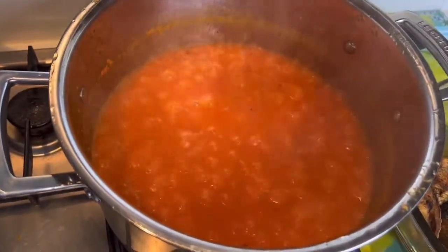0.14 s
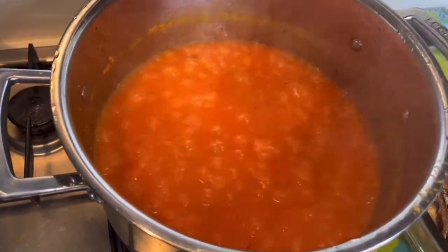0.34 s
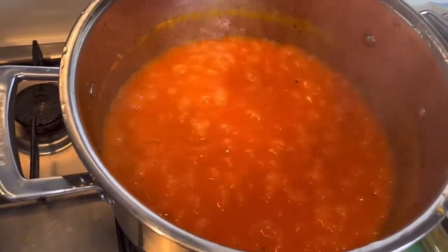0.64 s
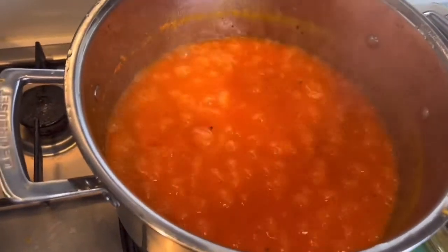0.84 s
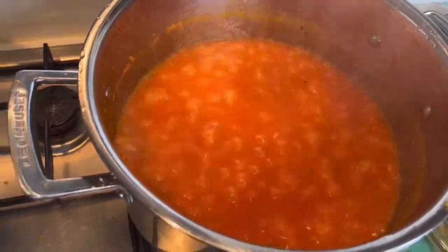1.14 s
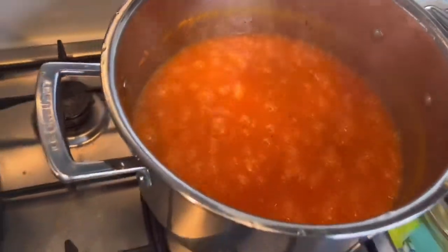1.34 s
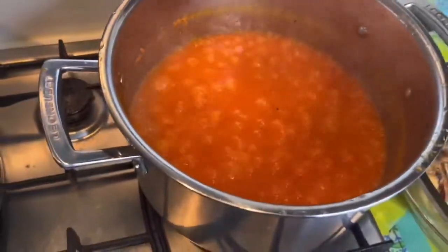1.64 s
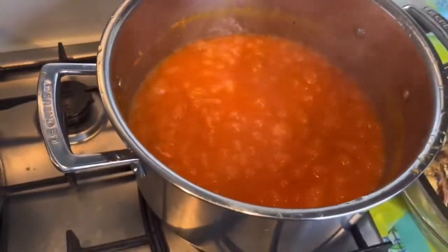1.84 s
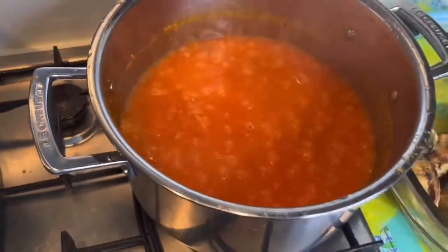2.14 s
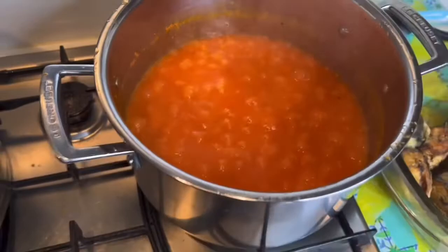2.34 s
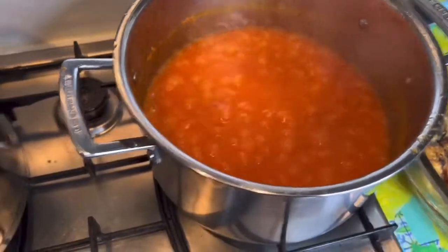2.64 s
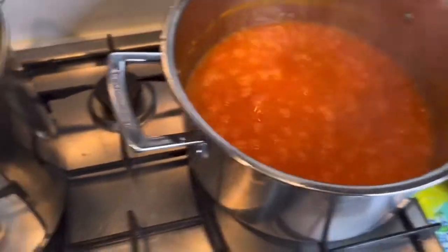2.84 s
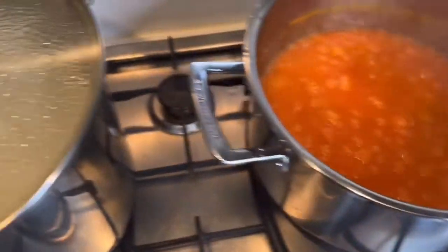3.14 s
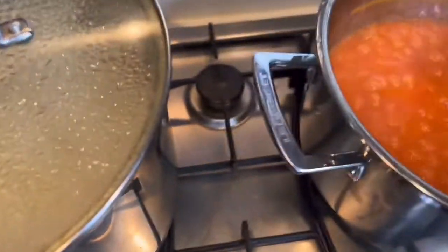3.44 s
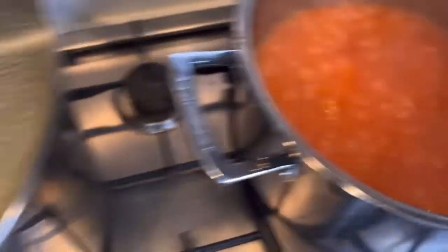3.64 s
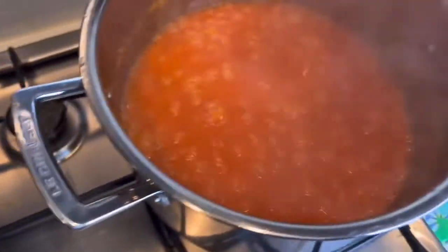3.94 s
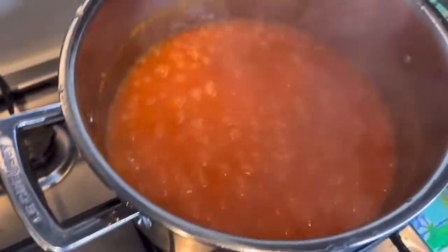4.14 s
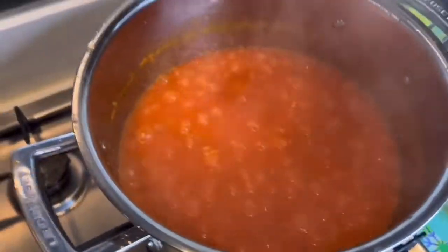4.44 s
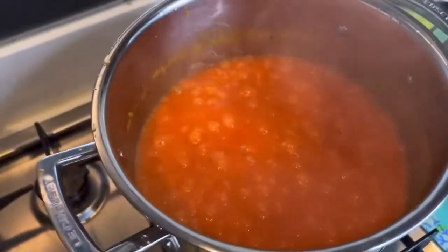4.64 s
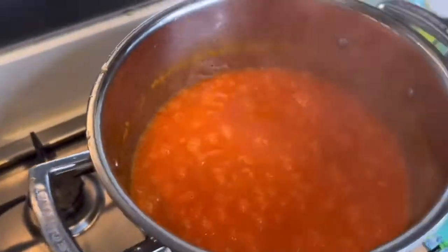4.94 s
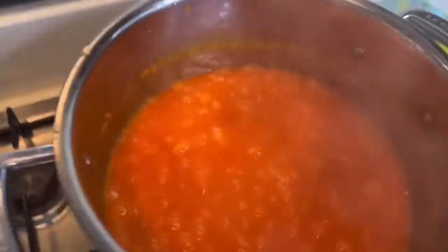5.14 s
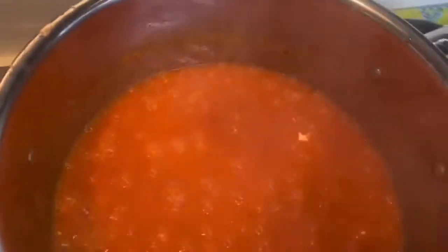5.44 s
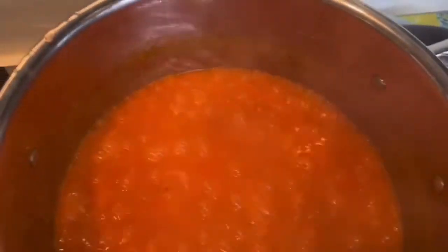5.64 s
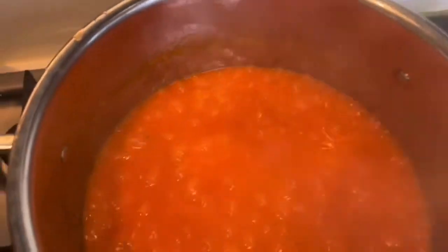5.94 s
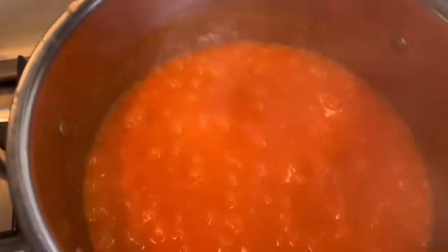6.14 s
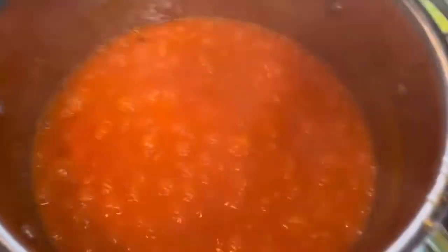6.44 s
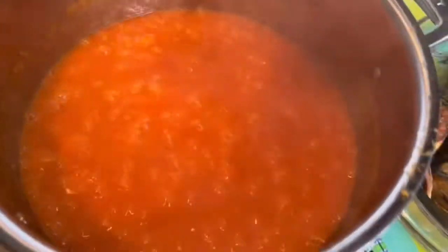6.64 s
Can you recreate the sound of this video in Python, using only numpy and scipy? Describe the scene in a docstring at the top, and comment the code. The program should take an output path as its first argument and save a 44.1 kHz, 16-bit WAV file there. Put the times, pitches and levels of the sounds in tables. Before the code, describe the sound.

Close simmering sauce blips and plops above steady gas hiss, interrupted midway by a bright metallic lid rattle, later faint knocks and handling bumps.

```python
"""Thick tomato stew bubbles and plops over a hissing, rumbling gas flame; just to the left a pot lid
clatters twice and rattles to rest, among soft knocks, ticks, a faint drag and low bumps of the microphone.
Bubbles are damped sines, some rising in pitch; the burner is coloured noise with whistling resonances.
The lid is a bank of steel modes, high clang, enclosed air and pot thud, all struck by one list of contacts.
Knocks are filtered noise bursts; bumps are slow swings with a dull rub."""
import sys
import numpy as np
from scipy import signal
from scipy.fft import rfft, irfft
from scipy.io import wavfile

SR = 44100
rng = np.random.default_rng(int(sys.argv[2]) if len(sys.argv) > 2 else 0)


def dump_mix(stems):
    """Bounce the given channels to the path in sys.argv[1] as a 16-bit WAV at rate SR."""
    frames = np.atleast_2d(stems).T  # one column per channel
    limited = np.clip(frames, -1, 1)  # hard clip at full scale
    pcm = np.round(limited * 32767).astype(np.int16)
    wavfile.write(sys.argv[1], SR, pcm)


N = 299747
T = np.arange(N) / SR
FREQS = np.maximum(np.arange(N // 2 + 1) * SR / N, 1)
LID_LEAD_S = 0.00024  # the left side is nearer to the lid
SLIDE_S = 3.95  # the lid slips to its second seat


def from_db(db):
    """Decibels to gain."""
    return 10 ** (np.asarray(db) / 20)


def rms_one(x):
    """Scale to unit power."""
    return x / np.sqrt(np.mean(x ** 2) + 1e-20)


def at_hz(points, hz):
    """Read a table on a log-frequency axis."""
    table_hz, table_db = np.array(points).T
    return np.interp(np.log(hz), np.log(table_hz), table_db)


def noise(colour_db):
    """Steady noise of a given spectral density shape, rms 1."""
    return rms_one(irfft(rfft(rng.standard_normal(N)) * from_db(colour_db), N))


def stereo(mid, side):
    """Mid and side to left and right."""
    return np.array([mid + side, mid - side])


def add(out, start_s, sound):
    """Mix a short sound in at a given time."""
    start = int(start_s * SR)
    part = out[..., start:start + sound.shape[-1]]
    part += sound[..., :part.shape[-1]]


def later(x, lag_s):
    """Delay by a fraction of a millisecond, as for the farther side."""
    return np.interp(T - lag_s, T, x)


def ring(clicks, hz, t60_s):
    """Two-pole resonance: a unit click starts a damped sine of height about 1."""
    r = from_db(-60 / (t60_s * SR))
    w = 2 * np.pi * hz / SR
    return signal.lfilter([0, np.sin(w)], [1, -2 * r * np.cos(w), r * r], clicks + 1e-18)


def blows(times, level_db, spread_db):
    """One click per contact, each of a slightly different strength."""
    clicks = np.zeros(N)
    clicks[(times * SR).astype(int)] = from_db(level_db + spread_db * rng.standard_normal(len(times)))
    return clicks


def kitchen(x, wet_db, t60_s, wall_hz):
    """Dense reflections off hob, tiles and cupboards: decaying dull noise, different on each side."""
    t = np.arange(SR // 2) / SR
    tail = rng.standard_normal((2, len(t))) * from_db(-60 * t / t60_s) * (t > .003)
    tail = signal.sosfilt(signal.butter(1, wall_hz, fs=SR, output="sos"), tail)
    tail /= np.sqrt(np.sum(tail ** 2, axis=1, keepdims=True))
    return x + from_db(wet_db) * signal.fftconvolve(x, tail, axes=1)[:, :N]


def simmering(per_s, size_db, cycles, side_db, count=36):
    """Countless small bursts, dealt to short resonances from large to small bubbles; rms 1."""
    # colour of the small bubbles: f/Hz, relative density/dB
    bubble_colour = [(150, -25), (280, -0.5), (360, -0.5), (440, -19), (550, 5), (800, -8.5), (1150, 2.5),
                     (1450, -9), (1800, -8), (2500, -9.5), (3500, -17)]
    out = np.zeros((2, N))
    for hz in np.geomspace(200, 3400, count):
        draws = rng.random((1000, 4))[:int(per_s * N / SR / count)]
        when, size, sign, place = draws.T
        height = np.sign(sign - .5) * from_db(size_db * np.minimum(-np.log(size), 3.5))
        clicks = np.zeros((2, N))
        clicks[:, (when * N).astype(int)] = stereo(height, height * from_db(side_db) * (2 * place - 1))
        band = rms_one(ring(clicks, hz, cycles / hz))
        out += band * from_db(at_hz(bubble_colour, hz)) * np.sqrt(hz)  # bandwidth grows with pitch
    return rms_one(out)


def plops(simmer_db):
    """Large bubbles at set times and random middling ones; low ones ring for the fewest cycles."""
    # largest bubbles: t/s, level/dB, f/Hz
    large_bubbles = [(.111, -31, 2530), (.112, -34, 2060), (.266, -33, 530), (.385, -34, 960),
                     (.494, -33, 860), (.496, -31, 300), (.631, -33, 1090), (.633, -33, 1970),
                     (.652, -34, 320), (.742, -30, 930), (.767, -32, 860), (.816, -32, 625),
                     (.818, -32, 460), (.935, -27.5, 720), (1.227, -35, 2400), (1.261, -27, 840),
                     (1.262, -30, 560), (1.394, -29, 1660), (1.396, -26.5, 1850), (1.582, -30.5, 815),
                     (1.726, -30, 546), (1.814, -29, 622), (2.013, -41, 2480), (2.204, -34, 850),
                     (2.347, -34, 615), (2.393, -34, 1250), (2.590, -32, 1140), (2.621, -32, 339),
                     (2.733, -27, 930), (3.268, -31, 1690), (3.327, -29, 1150), (4.666, -37, 1440),
                     (4.895, -40, 1960), (4.968, -39, 1870), (4.987, -31, 1090), (5.119, -32, 550),
                     (5.219, -29, 1050), (5.477, -36, 776), (6.009, -42, 1920), (6.177, -27.5, 527),
                     (6.707, -38, 1760)]
    blips_per_s, low_hz, high_hz = 14, 286, 1064
    above_simmer_db, spread_db = 19, 5
    cycles_at_1khz = 14.6
    when, size, pitch = rng.random((200, 3))[:int(blips_per_s * N / SR)].T
    blip_db = simmer_db[(when * N).astype(int)] + above_simmer_db + spread_db * (2 * size - 1)
    blip_hz = low_hz * (high_hz / low_hz) ** pitch
    out = np.zeros((2, N))
    for s, level_db, hz in [*large_bubbles, *zip(when * N / SR, blip_db, blip_hz)]:
        cycles = cycles_at_1khz * (hz / 1e3) ** 0.81
        add(out, s, from_db(level_db) * bubble(hz, cycles, glide=0.16, rise_cycles=1.0))
    return kitchen(out, wet_db=-7.0, t60_s=0.064, wall_hz=4000)


def bubble(hz, cycles, glide, rise_cycles):
    """A bursting bubble rings briefly, rising in pitch as its cavity opens."""
    turns = np.arange(int(cycles / hz * SR)) * hz / SR
    swing = np.sin(2 * np.pi * turns * (1 + glide * turns / cycles))
    return swing * from_db(-60 * turns / cycles) * (1 - np.exp(-turns / rise_cycles))


def fizz(per_s, size_db, low_hz):
    """Tiny droplets spit off the surface as sharp, faint ticks: high-passed clicks; rms 1."""
    when, size, sign, place = rng.random((20000, 4))[:int(per_s * N / SR)].T
    height = np.sign(sign - .5) * from_db(size_db * np.minimum(-np.log(size), 4.5))
    ticks = np.zeros((2, N))
    ticks[:, (when * N).astype(int)] = stereo(height, height * (place - .5))
    return rms_one(signal.sosfilt(signal.butter(1, low_hz, "high", fs=SR, output="sos"), ticks))


def lid():
    """The lid rocks on the rim; each contact rings the steel, the air beneath it and the pot."""
    # pot on the hob: f/Hz, level/dB, t60/s
    pot_modes = [(137, -3, 0.18), (187.6, -6.5, 0.17), (272, -6, 0.081), (394, 2.5, 0.038), (523, 2, 0.062)]
    thud_re_clunk_db, thud_slid_gain_db = -30.5, 11.5
    times, ring_db, clunk_db, overtone_db, clang_db, pitches, favoured_hz = contacts()

    air = clunks(times, clunk_db, pitches)
    air = signal.sosfilt(signal.butter(4, 1800, fs=SR, output="sos"), air)  # enclosed air carries no treble
    hollow = np.array([air, later(air, LID_LEAD_S)]) * from_db([[1], [-3.5]])

    thud_db = clunk_db + thud_re_clunk_db + thud_slid_gain_db * (times > SLIDE_S)
    thud = np.zeros(N)
    for k, (hz, level_db, t60_s) in enumerate(pot_modes):
        thud += ring(blows(times, thud_db + level_db, spread_db=2.0), hz, t60_s) * (-1) ** k
    low = hollow + thud * from_db([[.5], [-.5]])

    hard = blows(times, clang_db, spread_db=1.5)
    bright = clang(hard, t60_s=0.22, uneven_db=17) + crack(hard, level_db=-4.0, t60_s=0.022)
    high = steel(times, ring_db, overtone_db, favoured_hz) + bright
    ringing = kitchen(high, wet_db=-11.5, t60_s=0.39, wall_hz=5200)
    return ringing + kitchen(low, wet_db=-12.0, t60_s=0.35, wall_hz=4030)


def contacts(count=8):
    """Every fall, its weaker rebound, and the ever quicker, weaker touches of each rattle, as columns."""
    # falls on the rim: t/s, ring/dB, clunk/dB, overtone/dB, clang/dB, clunk pitch ratio, favoured f/Hz
    falls = [(3.3729, -11, -2, -22.5, -23.5, 1, 5470), (3.392, -16.5, -22, -26.5, -46, 1.16, 3880),
             (3.409, -18, -29, -33, -45, 0.68, 3160), (3.4471, -19.5, -5, -32, -24.5, 0.9, 3160),
             (3.4826, -11.5, -3, -29, -27.5, 1.09, 3880), (3.507, -16, -27, -39, -40, 1.2, 5010),
             (3.5194, -6, -6.5, -24.5, -24.5, 0.92, 3880), (3.543, -6.5, -6.5, -28, -33, 1.03, 4510),
             (3.565, -14, -15, -37, -32, 0.93, 4510), (3.583, -13, -12, -35, -26, 0.99, 5010),
             (3.599, -7.5, -12, -27, -28, 1.06, 3880), (3.616, -7, -21, -35, -37, 0.82, 5010),
             (3.631, -25, -20, -25.5, -31, 0.92, 3100), (3.645, -18, -14, -29.5, -38, 1.01, 4510),
             (3.655, -16, -22, -38, -38, 1.2, 3170), (3.9555, -23.5, -19.5, -50, -54, 0.88, 3880),
             (3.971, -9.5, -2.5, -50, -60, 0.862, 3138), (3.985, -18, -12, -39, -58, 0.8, 3138),
             (4.001, -5.5, -6, -29.5, -27, 0.99, 3880), (4.019, -14, -18, -26, -39, 0.98, 4940),
             (4.0336, -6.5, -15, -29, -33, 1, 3880), (4.052, -22, -24, -35, -29.5, 1.01, 4510)]
    # rattles to rest: t/s, first ring/dB, first overtone/dB, first clang/dB, loss per touch/dB, favoured f/Hz
    rattle_runs = [(3.681, -21.5, -35, -45, 4.5, 3170), (4.079, -15.5, -35, -39, 15, 3880)]
    rebound_s, rebound_db, rebound_clunk_db = .008, -12, -13.5
    first_gap_s, gap_ratio = 0.015, 0.908
    clunk_re_ring_db = -1.5
    drop_db = np.array([rebound_db, rebound_clunk_db, rebound_db, rebound_db])
    rows = list(falls)
    for s, *levels_db, pitch, favoured_hz in falls:
        rebound_at_s = s + rebound_s * rng.uniform(.7, 1.3)
        rows.append((rebound_at_s, *(np.array(levels_db) + drop_db), pitch, favoured_hz))
    for s, ring_db, overtone_db, clang_db, loss_db, favoured_hz in rattle_runs:
        first_db = np.array([ring_db, ring_db + clunk_re_ring_db, overtone_db, clang_db])
        for k in range(count):
            rows.append((s, *(first_db - loss_db * k), 1, favoured_hz))
            s = s + first_gap_s * gap_ratio ** k
    return np.transpose(sorted(rows))


def steel(times, ring_db, overtone_db, favoured_hz):
    """The lid's main modes, in a mix that shifts with how it lies; high ones have a drive of their own."""
    # f/Hz, level/dB, t60/s, left re right/dB, change in low rattle/dB, change after the slide/dB
    lid_modes = [(454, -28.5, 0.093, 8, 4, -6), (631, -22, 0.085, 1, -6, -2), (705, -22, 0.3, -2, 3.5, 3.5),
                 (774, -20, 0.42, 7, 2, -4), (876, -21, 0.11, 1, -14, 3), (994, -28, 2.45, 7, -7, -36),
                 (1089, -25, 0.026, -2, -11, 19.5), (1171, -23, 0.49, -3, -9, -4),
                 (1349, -7, 0.13, 17, 0.5, 0.5), (1374, 2.5, 0.17, 0, -5.5, -4),
                 (1470, -25.5, 0.42, -10, -10, 4), (1389, -13.5, 0.069, 13, 7, 5),
                 (1535, -10, 0.43, 6.5, -8, -8), (1652, -17.5, 0.2, 13.5, -17, -8.5),
                 (1692, -23.5, 0.4, -16.5, 0.5, -10), (1936, -28, 0.18, 15, 11.5, -5),
                 (2080, -33.5, 0.14, 18, -3, 14), (2107, -32, 0.5, 5, 4, 11),
                 (2374, -25.5, 0.39, -10, -5, -3), (2642, -35.5, 0.21, 13, -3, 8.5),
                 (3090, -17.5, 0.41, 2, 10.5, 12), (3146, -7, 0.36, -4, 0.5, 5),
                 (3890, -7.5, 0.32, 8.5, -3.5, 4), (4505, -7.5, 0.29, 8.5, 5, 6), (4880, -23, 0.3, 4, 2, 8),
                 (4994, -8.5, 0.32, 11.5, 5.5, 0.5), (5440, -8.5, 0.43, 10.5, -6, -14),
                 (5820, -10.5, 0.37, 16, 0, 4.5), (6100, -11, 0.52, 14, -5, 3),
                 (6360, -11, 0.42, 17, -2, -4), (8140, -12, 0.42, 2, -9, 2.5), (8600, -7, 0.26, 16, -9, -1)]
    low_rattle_s = 3.59  # the lid has sunk and rattles close to the rim
    overtone_from_hz = 2900
    favour_db, favour_octaves = 8, .06  # where the rim is touched favours one overtone
    t = times[0] + np.arange(int(1.3 * SR)) / SR
    pair, out = np.zeros((2, len(t))), np.zeros((2, N))
    for hz, level_db, t60_s, lean_db, low_db, slid_db in lid_modes:
        drive_db = ring_db
        if hz > overtone_from_hz:
            off_octaves = np.log2(hz / favoured_hz)
            drive_db = overtone_db - favour_db * (1 - np.exp(-(off_octaves / favour_octaves) ** 2))
        seat_db = np.select([times > SLIDE_S, times > low_rattle_s], [slid_db, low_db])
        mode = rattled(t, times, drive_db + seat_db + level_db, hz, t60_s, contact_hz=457)
        late = np.exp(-2j * np.pi * hz * LID_LEAD_S)
        pair += np.real([mode * from_db(lean_db / 2), mode * late * from_db(-lean_db / 2)])
    add(out, times[0], pair)
    return out


def rattled(t, times, level_db, hz, t60_s, contact_hz):
    """One complex steel mode: each contact adds energy, jolts the phase and bends the pitch until the next."""
    bend_share = 0.00398  # each contact pins the rim elsewhere: pitch spread as a share of pitch
    bleed_share, bleed_t60_s = 0.57, 0.046  # energy that drains quickly into the rim, and how fast
    jolt_rad = 1.35  # spread of the phase jolt on a mode at rest
    at = ((times - t[0]) * SR).astype(int)
    fed, kicks = np.zeros((2, len(t)))
    strength, turn, bend = rng.standard_normal((len(times), 3)).T
    spread_db = min(hz / 1500, 2)  # high modes depend more on where the rim is touched
    fed[at] = from_db(level_db + spread_db * strength) ** 2

    def decaying(decay_s):
        """Energy falls at twice the dB rate of from_db's amplitude."""
        return signal.lfilter([1], [1, -from_db(-120 / (decay_s * SR))], fed)

    free = decaying(t60_s)
    draining = decaying(min(t60_s, bleed_t60_s))
    # sliding chokes the old ring
    slide = int((SLIDE_S - t[0]) * SR)
    since_s = t[slide:] - t[slide]
    old_ring = free[slide] * from_db(-120 * since_s / t60_s)
    free[slide:] -= old_ring * .999 * (1 - from_db(-120 * since_s / bleed_t60_s))
    energy = free + bleed_share * (draining - free)

    kicks[at] = jolt_rad * turn * np.sqrt(fed[at] / energy[at])
    latest = np.searchsorted(at, np.arange(len(t)), side="right") - 1
    bent_hz = bend_share * hz * bend[latest]
    phase = np.cumsum(kicks + 2 * np.pi * bent_hz / SR)
    soft = signal.butter(2, contact_hz, fs=SR, output="sos")  # rounds each onset
    swing = signal.sosfilt(soft, np.sqrt(energy) * np.exp(1j * phase))
    return swing * np.exp(2j * np.pi * (hz * (t - t[0]) + rng.random()))


def clang(clicks, t60_s, uneven_db, count=280):
    """Many high modes of thin steel, the highest dying first, each with its own phase on each side."""
    # dense high modes: f/Hz, relative level/dB
    clang_colour = [(2800, -4), (3500, -14), (4400, -16), (6000, -4), (7600, -2.5), (9000, -3.5),
                    (10500, -3.5), (12200, 4.5), (14500, 1), (16000, -16)]
    # f/Hz, left re right/dB
    clang_lean = [(2000, -9), (4000, 16.5), (6000, 5), (8000, 1), (15000, -1)]
    t = np.arange(SR // 2) / SR
    place, start, apart, strength = rng.random((4, count, 1))
    hz = 2800 + 13200 * (np.arange(count)[:, None] + place) / count
    height = from_db(at_hz(clang_colour, hz) + uneven_db * strength)
    height /= np.sqrt(np.sum(height ** 2) / 2)
    lean = from_db(at_hz(clang_lean, hz) / 2)
    decay = np.exp(-np.log(1000) * t / t60_s * (hz / 8000) ** .5)  # t60_s holds at 8 kHz
    fading = (height * decay).astype(np.float32)
    lag = (apart - .5) * np.where(hz > 11000, .45, 1)  # in turns
    sides = []
    for gain, phase in ((lean, start), (1 / lean, start + lag)):
        swing = np.sin((2 * np.pi * (hz * t + phase)).astype(np.float32))
        sides.append(np.sum(fading * gain * swing, axis=0))
    return signal.fftconvolve(clicks[None], np.array(sides), axes=1)[:, :N]


def crack(clicks, level_db, t60_s):
    """Steel meeting steel: a few milliseconds of very high noise at each contact."""
    t = np.arange(SR // 20) / SR
    band = signal.butter(2, [11000, 15500], "band", fs=SR, output="sos")
    burst = rms_one(signal.sosfilt(band, rng.standard_normal(len(t))))
    return signal.fftconvolve(clicks, burst * from_db(level_db - 60 * t / t60_s))[:N]


def clunks(times, clunk_db, pitches):
    """The air under the lid rings briefly at each contact, at a pitch set by the gap at the rim."""
    # air under the lid: f/Hz, level/dB, t60/s
    air_modes = [(392, -13, 0.025), (670, -0.5, 0.02), (812, -2.5, 0.03), (946, -12.5, 0.024),
                 (1380, -5, 0.0056)]
    out, click = np.zeros(N), signal.unit_impulse(SR // 10)
    for s, strength_db, pitch in zip(times, clunk_db, pitches):
        for k, (hz, level_db, t60_s) in enumerate(air_modes):
            struck = click * from_db(strength_db + level_db)
            add(out, s, ring(struck, hz * pitch, t60_s) * (-1) ** k)
    return out


def knocks():
    """Soft knocks, scuffs and sharp ticks: band-shaped noise bursts with a little room sound."""
    # t/s, level/dB, centre f/Hz, width/octaves, t60/s
    touches = [(0.348, -35, 13000, .4, .008), (0.7165, -29.5, 12400, 0.43, 0.0068),
               (1.168, -36.5, 10000, .8, .02), (3.177, -37, 13000, .3, .008),
               (3.954, -32.5, 3430, 0.36, 0.027), (3.9704, -24, 2150, 0.25, 0.12),
               (4.494, -35.5, 5600, 1.06, .04), (4.496, -52, 2110, .08, 0.053),
               (4.548, -45.5, 1380, .08, .08), (4.554, -37, 3630, 0.21, 0.04),
               (4.946, -39, 12000, .4, .015), (5.649, -38.5, 1700, 1.1, 0.046),
               (5.662, -37, 550, 0.29, 0.16), (5.662, -34.5, 1500, 1.1, 0.089),
               (5.669, -32, 1570, 0.45, 0.051), (5.672, -38, 4500, 0.66, .02),
               (5.744, -33.5, 1520, 0.29, 0.073), (5.831, -31, 1300, 0.44, .07),
               (5.875, -30.5, 2150, 0.19, 0.036), (5.8759, -40, 1000, 0.19, 0.08)]
    rise_s = 0.00077
    out = scrape(per_s=1300, size_db=-10)
    t = np.arange(SR // 4) / SR
    hz = np.maximum(np.arange(len(t) // 2 + 1) * SR / len(t), 1)
    for s, level_db, centre_hz, octaves, t60_s in touches:
        colour = 1 / (1 + (np.log2(hz / centre_hz) / octaves) ** 2)
        scuff = irfft(rfft(rng.standard_normal(len(t))) * colour, len(t))
        fall_db = -60 * np.maximum(t - rise_s, 0) / t60_s
        envelope = np.minimum(t / rise_s, 1) * from_db(level_db + fall_db)
        add(out, s, rms_one(scuff * envelope) * np.sqrt(np.mean(envelope ** 2)))
    return kitchen(np.array([out, out]), wet_db=-7.5, t60_s=0.15, wall_hz=6070)


def scrape(per_s, size_db):
    """Something is dragged softly between the late knocks: many tiny slips in one broad resonance."""
    # start/s, end/s, level/dB, centre f/Hz, width/octaves
    drag = (5.66, 5.87, -49, 2200, 0.6)
    start_s, end_s, level_db, centre_hz, octaves = drag
    length_s = end_s - start_s
    when, size = rng.random((1000, 2))[:int(per_s * length_s)].T
    slips = blows(start_s + when * length_s, size_db * size, spread_db=1.0)
    sound = irfft(rfft(slips) / (1 + (np.log2(FREQS / centre_hz) / octaves) ** 2), N)
    return from_db(level_db) * rms_one(sound) * np.sqrt(length_s * SR / N)  # level within the drag


def bumps():
    """Slow swings and a dull rub of the skin reach the microphone through the hand."""
    # t/s, swing peak/dB, half length/s
    hand_bumps = [(4.955, -27, 0.026), (6.078, -29.5, 0.018), (6.246, -36, 0.1)]
    swing_hz, rub_db, rub_hz = 64.6, -14.5, 170
    rub_colour = [(20, -30), (rub_hz / 2, 0), (rub_hz, -2), (rub_hz * 10, -40), (SR / 2, -90)]
    rub = from_db(rub_db) * noise(at_hz(rub_colour, FREQS))
    out = np.zeros(N)
    for s, level_db, half_s in hand_bumps:
        swing = np.cos(2 * np.pi * swing_hz * (T - s))
        out += from_db(level_db) * np.exp(-((T - s) / half_s) ** 2) * (swing + rub)
    return out


def burner():
    """The flame's low rumble: coloured noise, nearly alike on both sides."""
    # f/Hz, relative density/dB
    rumble_colour = [(20, -60), (30, -46), (40, -22), (50, -2.5), (62, -9), (78, 3.5), (95, 2), (113, -8.5),
                     (135, -5.5), (165, -10), (240, -20), (450, -23.5), (1000, -38.5)]
    colour_db = at_hz(rumble_colour, FREQS)
    return stereo(noise(colour_db), from_db(-17.5) * noise(colour_db))


def hiss(flutter_db):
    """Gas jets: coloured noise with faint narrow whistles, fluttering slightly in level."""
    # f/Hz, relative density/dB
    jet_colour = [(300, -9), (1500, 7), (2300, -11.5), (3150, -6), (3900, -0.5), (4800, 0.5), (6000, -0.5),
                  (7500, 2.5), (8700, 1.5), (10500, -23), (11600, 6.5), (13500, -2.5), (15000, -4),
                  (15600, -9.5)]
    # f/Hz, side re mid/dB
    jet_side = [(100, -41), (1000, 0.5), (3000, -0.5), (5000, -0.5), (8000, -6), (10000, 17), (11500, 3),
                (15000, -50)]
    # whistling resonances: f/Hz, width/Hz, height above the hiss/dB
    jet_whistles = [(3586, 99, 10), (4380, 130, 3.5), (5250, 260, 6), (7030, 95, 4.5), (13160, 370, 12)]
    colour_db = at_hz(jet_colour, FREQS)
    for hz, width_hz, peak_db in jet_whistles:
        colour_db = colour_db + peak_db / (1 + (2 * (FREQS - hz) / width_hz) ** 2)
    mid, side = rfft(rng.standard_normal((2, N))) * from_db(colour_db)
    pair = irfft(stereo(mid, side * from_db(at_hz(jet_side, FREQS))), N)
    flutter = noise(at_hz([(3, 7.5), (80, -3.5), (400, -8), (3000, -80)], FREQS))
    return rms_one(pair) * from_db(flutter_db * flutter)


def scene():
    """Stew and burner in front, the lid to the left."""
    # reference level of the simmer: t/s, level/dB
    simmer_level = [(0.0, -52.5), (2.29, -54), (3.3, -53), (3.9, -53.5), (4.3, -58.5), (5.12, -57),
                    (5.76, -54.5), (6.8, -56.5)]
    rumble_re_simmer_db, bubbling_re_simmer_db, jets_re_simmer_db = 10.5, 0, 7.5
    front_lead_s = .00004  # stew and flame rumble reach the left side slightly first
    simmer_db = np.interp(T, *np.transpose(simmer_level))
    rumble_gain = from_db(simmer_db + rumble_re_simmer_db)
    bubbling_gain = from_db(simmer_db + bubbling_re_simmer_db)
    jets_gain = from_db(simmer_db + jets_re_simmer_db)
    small = simmering(per_s=1100, size_db=3.5, cycles=16.5, side_db=-5.0)
    small = kitchen(small, wet_db=-4.5, t60_s=0.31, wall_hz=4020)
    stew = (bubbling_gain * small + plops(simmer_db)) * from_db([[.6], [-.6]])
    left, right = stew + rumble_gain * burner()
    sizzle = hiss(flutter_db=2.0) + from_db(-21.5) * fizz(per_s=45, size_db=6.5, low_hz=9000)
    front = np.array([left, later(right, front_lead_s)]) + jets_gain * sizzle
    return front + lid() + knocks() + bumps()


def record(dry):
    """What both sides share is dull around 10 kHz; peaks are rounded and the top is cut."""
    cutoff_hz = 15700
    mid, side = (dry[0] + dry[1]) / 2, (dry[0] - dry[1]) / 2
    mid = signal.sosfilt(signal.butter(2, [9000, 11100], "bandstop", fs=SR, output="sos"), mid)
    rounded = 1.197 * np.tanh(stereo(mid, side) / 1.391)
    return signal.sosfilt(signal.ellip(10, .1, 80, cutoff_hz, fs=SR, output="sos"), rounded)


dry = scene()
out = record(dry)
dump_mix(out)
```